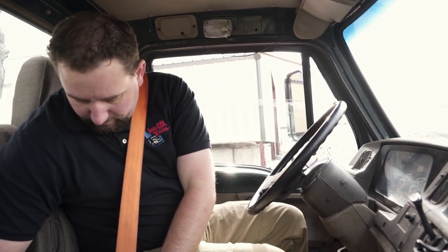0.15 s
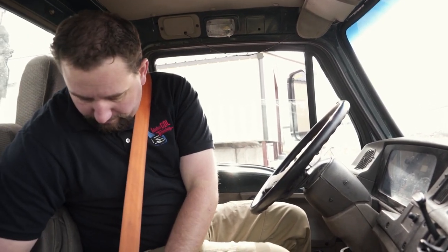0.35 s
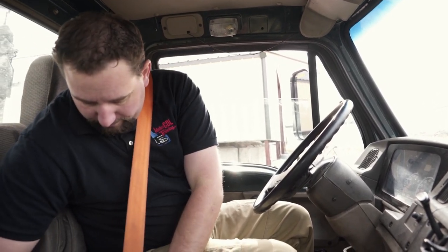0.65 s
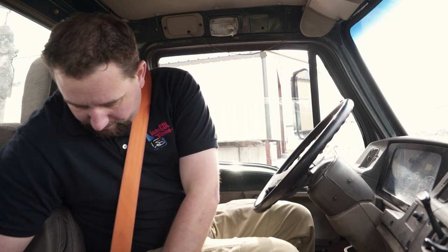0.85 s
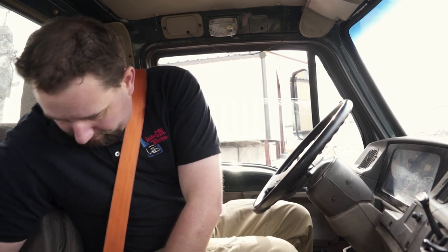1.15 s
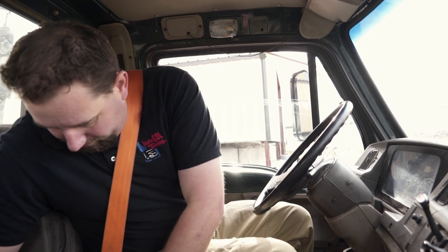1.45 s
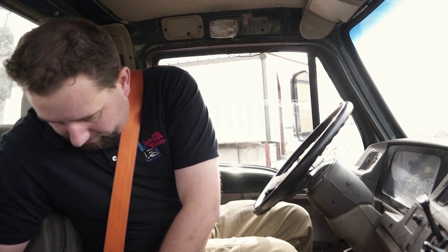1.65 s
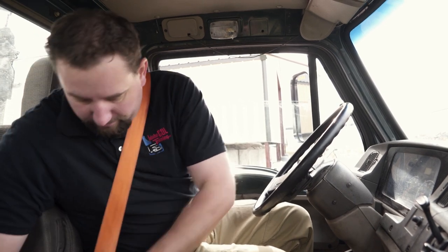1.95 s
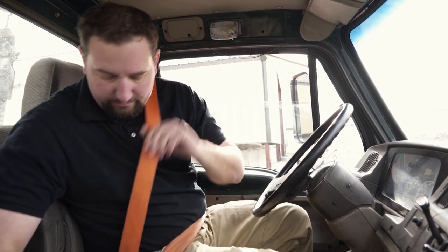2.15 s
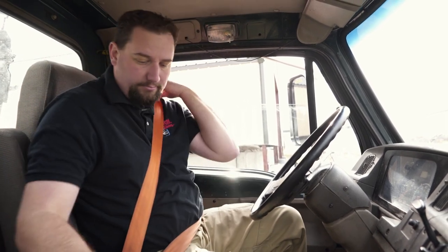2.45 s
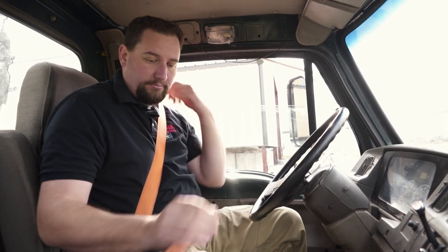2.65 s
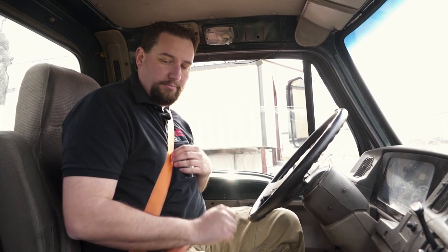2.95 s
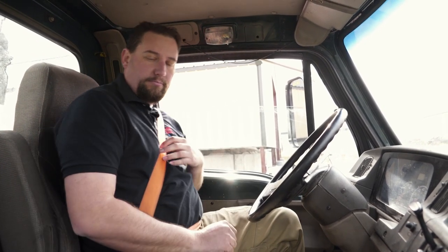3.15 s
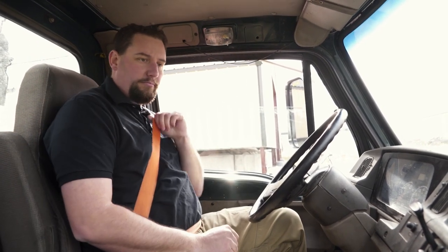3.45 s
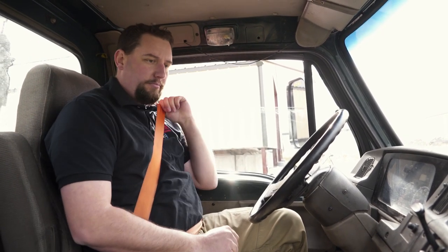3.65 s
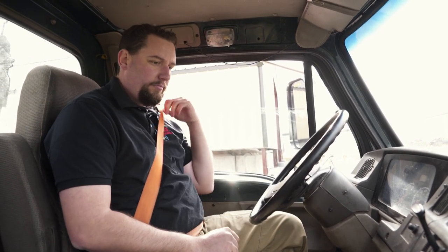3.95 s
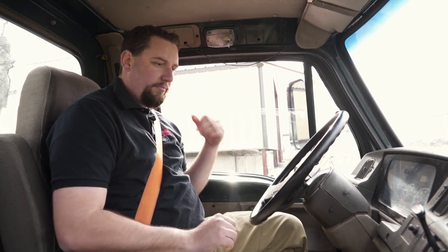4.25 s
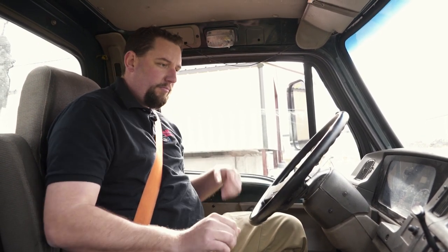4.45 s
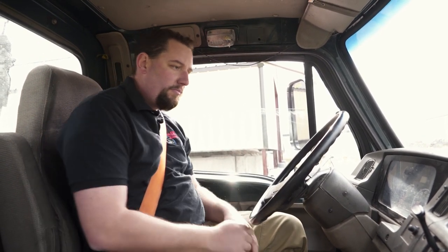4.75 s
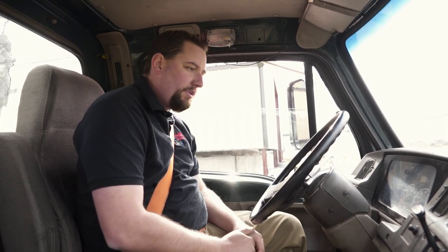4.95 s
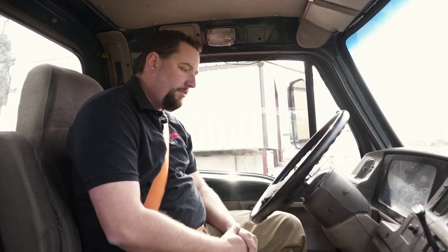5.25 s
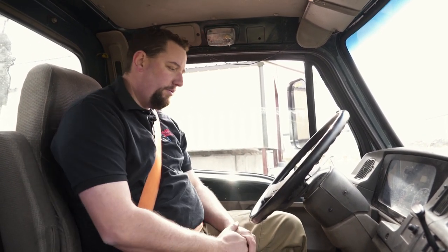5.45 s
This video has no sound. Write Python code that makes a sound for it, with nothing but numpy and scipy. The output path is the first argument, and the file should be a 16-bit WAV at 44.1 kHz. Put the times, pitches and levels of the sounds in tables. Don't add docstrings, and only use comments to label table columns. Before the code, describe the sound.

Inside a parked truck cab, cloth scuffs and a buckle knocks and rattles, then latches with a sharp metallic snap before soft webbing strokes and thuds.

```python
import sys
import numpy as np
from scipy import signal
from scipy.fft import rfft, irfft, next_fast_len
from scipy.io import wavfile
from scipy.ndimage import uniform_filter1d, map_coordinates

SR = 44100
rng = np.random.default_rng(int(sys.argv[2]) if len(sys.argv) > 2 else 0)


def volts_from_decibels(level):
    exponent = np.asarray(level, float) / 20
    return 10 ** exponent


def master(y):
    cut = np.clip(np.atleast_2d(y).T, -1, 1)
    pcm = np.round(cut * 32767)
    wavfile.write(sys.argv[1], SR, pcm.astype(np.int16))


N = 246903
LATCHED_S = 1.7


def along(points, hz):
    f, v = np.transpose(points)
    return np.interp(np.log(hz + 1), np.log(f + 1), v)


def curve(points):
    s, db = np.transpose(points)
    return np.interp(np.arange(N) / SR, s, db)


def wobble(rate_hz):
    knots = rng.standard_normal(int(N * rate_hz / SR) + 4)
    return map_coordinates(knots, [np.arange(N) * rate_hz / SR])


def coloured(x, spectrum):
    m = next_fast_len(len(x) + 8192)
    gain = volts_from_decibels(along(spectrum, np.fft.rfftfreq(m, 1 / SR)))
    return irfft(rfft(x, m) * gain, m)[:len(x)]


def noise(spectrum, size, grit_db=0):
    grains = rng.standard_normal(size) * volts_from_decibels(grit_db * rng.standard_normal(size))
    x = coloured(grains, spectrum)
    return x / np.sqrt(np.mean(x ** 2))


def add(track, s, sound):
    part = track[round(s * SR):][:len(sound)]
    part += sound[:len(part)]


def swells(rows, levels_db):
    t = np.arange(0, N / SR + .01, .001)[:, None]
    peak, rise, fall = (np.array([row[k] for row in rows]) for k in (0, 2, 3))
    away = np.where(t < peak, (peak - t) / rise, (t - peak) / fall)
    power = np.sum(volts_from_decibels(levels_db - 20 * away) ** 2, axis=1)
    return np.interp(np.arange(N) / SR, t[:, 0], np.sqrt(power))


def patchy(x, depth_db):
    z = signal.stft(x, nperseg=512)[2]
    field = uniform_filter1d(rng.standard_normal(z.shape), size=9, axis=0)
    field = uniform_filter1d(field, size=9, axis=1)
    return signal.istft(z * volts_from_decibels(depth_db * field / field.std()), nperseg=512)[1][:N]


# pitch_hz, level_db
QUIET_COLOUR = [(12, -34.5), (20, -6), (70, 3.5), (154, -2.5), (293, -19), (485, -10.5), (1120, -17),
                (1290, -20.5), (11400, -48), (12300, -70.5), (16000, -73.5)]


def quiet_cab():
    return volts_from_decibels(-65) * noise(QUIET_COLOUR, N)


# time_s, level_db
SEAT_SWAY = [(0.0, -52), (0.36, -68.5), (0.65, -67), (0.9, -52), (1.54, -54), (1.64, -53), (2.17, -61),
             (2.45, -53), (2.77, -68.5), (3.04, -55.5), (3.2, -55), (3.55, -48.5), (3.84, -60), (4.13, -70),
             (5.01, -59), (5.6, -70)]
# pitch_hz, level_db
RUMBLE_COLOUR = [(8.8, -27), (15, 0), (37, 3.5), (65, -5.5), (140, -6.5), (225, -27), (260, -12),
                 (340, -59), (570, -120)]


def seat_rumble():
    return volts_from_decibels(curve(SEAT_SWAY) + 4.3 * wobble(5.4)) * noise(RUMBLE_COLOUR, N)


# peak_s, level_db, rise_s, fall_s
SCUFF_MOVES = [(0.0, -59.5, .1, 0.12), (.425, -64.5, 0.021, 0.17), (.53, -65, 0.34, 0.024),
               (.674, -59, 0.13, 0.15), (1.0, -54, 0.27, 0.14), (1.171, -47, 0.11, 0.049),
               (1.29, -52, 0.062, 0.14), (1.349, -46, 0.24, 0.0094), (1.41, -71, 0.11, 0.05),
               (1.74, -68, 0.41, 0.37), (1.93, -53.5, 0.026, 0.12), (2.13, -53, 0.37, 0.061),
               (2.37, -54, 0.6, 0.16), (2.54, -48.5, 0.11, 0.11), (2.66, -67.5, 0.063, 0.96),
               (3.04, -57, 0.25, 0.36), (3.28, -53.5, 0.073, 0.26), (3.66, -50, 0.18, 0.15),
               (3.8, -50.5, 0.022, 0.042), (3.89, -61.5, 0.11, 0.2), (4.09, -54.5, 0.1, 0.11),
               (4.229, -68.5, 0.022, 0.69), (4.87, -66, 1.42, 0.092), (5.06, -65, 0.079, 0.3),
               (5.429, -68, 0.072, 0.24)]
# pitch_hz, level_db
SCUFF_COLOUR = [(88, -29.5), (150, -2), (194, -3), (328, -4), (463, -6.5), (637, -7.5), (715, -8.5),
                (1800, -13), (3200, -34.5), (4160, -51), (7040, -120)]
# pitch_hz, level_db
BODY_SHADE = [(800, 0.5), (1500, -4), (2500, -2)]


def scuffing(flutter):
    levels_db = np.transpose(SCUFF_MOVES)[1]
    unsteady = volts_from_decibels(0.74 * flutter + 2.6 * wobble(90))
    scuff = swells(SCUFF_MOVES, levels_db) * unsteady * noise(SCUFF_COLOUR, N, grit_db=3.0)
    bent_over = np.arange(N) < LATCHED_S * SR
    return np.where(bent_over, coloured(scuff, BODY_SHADE), scuff)


# peak_s, level_db, rise_s, fall_s, weave_over_rub_db
WEBBING_TUGS = [
    (.1, -72.5, 0.14, 0.053, -7.5),
    (.5, -79, 0.066, 0.051, -15),
    (.666, -72, 0.096, 0.14, -9.5),
    (.812, -73, 0.051, 0.15, -13),
    (.99, -71, 0.33, 0.21, -11),
    (1.0, -75, 0.011, 0.18, -9),
    (1.178, -64.5, .15, 0.037, -11.5),
    (1.28, -67.5, 0.058, 0.13, -8.5),
    (1.346, -59.5, 0.17, 0.02, -20),
    (1.74, -66.5, 0.42, 0.2, -11),
]
# peak_s, level_db, rise_s, fall_s, weave_over_rub_db
SMOOTHING_STROKES = [(1.95, -64, 0.03, .06, -16), (2.01, -63, 0.041, 1.2, -12.5),
                     (2.18, -69, 0.28, 0.24, -17), (2.299, -48.5, 0.19, 0.17, -7),
                     (2.53, -60.5, 0.41, .16, -10.5), (2.66, -76.5, 0.11, 0.89, -5.5),
                     (3.08, -62, 0.22, 0.19, -7.5), (3.265, -69, 0.054, 0.23, -2.5),
                     (3.33, -66, 0.087, 0.19, -3.5), (3.56, -76, 0.2, .5, 4),
                     (3.677, -57.5, 0.18, 0.074, -2), (3.74, -70, 0.12, 0.38, 2),
                     (3.98, -78.5, 0.14, 0.15, 3), (4.047, -52, 0.045, 0.02, 0),
                     (4.09, -62.5, 0.072, 0.041, -11), (4.15, -75, 0.043, 0.024, -10),
                     (4.27, -74.5, 0.069, 0.081, -15), (4.62, -74, 0.11, 1.25, -10.5),
                     (4.86, -70, 0.6, 0.25, -6.5), (4.95, -66.5, 0.09, 0.12, -8.5),
                     (5.05, -83, .1, 0.76, 0.5), (5.259, -80, 0.07, 0.22, -3.5),
                     (5.4, -84.5, 0.045, .2, -12.5), (5.59, -75.5, .7, .1, -9)]
# pitch_hz, level_db
RUB_COLOUR = [(1060, -21), (1800, 1), (2760, -1), (3700, -5), (4010, -4), (5360, -10.5), (7000, -14),
              (9100, -32), (15400, -120)]
# pitch_hz, level_db
WEAVE_COLOUR = [(3240, -32), (5500, -3.5), (6270, -4), (7960, -2.5), (9800, -9), (12700, -38.5),
                (21600, -120)]
# pitch_hz, level_db
FIBRE_COLOUR = [(5590, -32.5), (9500, 0.5), (13100, 0.5), (15200, -7.5), (16000, -11)]


def webbing(flutter):
    drags = WEBBING_TUGS + SMOOTHING_STROKES
    rub_db, share_db = np.transpose(drags)[[1, 4]]
    rub = swells(drags, rub_db) * volts_from_decibels(0.61 * flutter + .6 * wobble(150))
    rub *= noise(RUB_COLOUR, N, grit_db=0.5)
    weave = swells(drags, rub_db + share_db) * volts_from_decibels(0.39 * flutter + 0.65 * wobble(220))
    weave *= noise(WEAVE_COLOUR, N, grit_db=5.5)
    fibre = swells(drags, rub_db + 1.2 * share_db - 2) * volts_from_decibels(.8 * flutter)
    fibre *= noise(FIBRE_COLOUR, N, grit_db=2.0)
    return rub + weave + fibre


def fabric():
    flutter = wobble(30)
    rumble = seat_rumble()
    scuff = scuffing(flutter)
    hiss = webbing(flutter)
    return rumble + patchy(scuff, depth_db=2.5) + patchy(hiss, depth_db=1.5)


# centre_s, peak_db, pitch_hz, half_length_s
SEAT_THUDS = [(.095, -49.5, 153, 0.0062), (0.491, -56.5, 298, 0.0099), (0.687, -44, 61.4, 0.015),
              (0.673, -47, 280, 0.008), (0.78, -41.5, 35.4, 0.017), (1.173, -42.5, 148, 0.011),
              (1.558, -40, 62, 0.035), (1.615, -30.5, 116, 0.008), (1.647, -32.5, 50.07, 0.016),
              (1.674, -28.5, 249, 0.0027), (1.679, -18, 144, 0.0033), (1.704, -39, 32, 0.044),
              (1.594, -44, 300, 0.0054), (1.6254, -26.5, 180, 0.0027), (1.66, -39, 198.9, .008),
              (1.919, -35, 202, 0.002), (1.769, -48.5, 29.6, 0.035), (2.475, -46, 155, 0.0039),
              (2.563, -35.5, 83, 0.011), (3.05, -54.5, 60.8, 0.046), (3.271, -43, 69, 0.015),
              (3.6765, -29.5, 159.4, 0.0038), (3.684, -28, 124, 0.0064), (3.697, -32, 69.5, 0.017),
              (4.091, -42, 241, 0.0051), (4.097, -25, 122.7, 0.0082), (4.109, -32.5, 80.3, 0.013),
              (4.128, -38.5, 45, 0.011), (4.155, -45, 44.9, 0.022), (4.939, -48, 269.5, 0.013)]


def thuds():
    out, t = np.zeros(N), np.arange(-SR // 12, SR // 12) / SR
    for s, db, hz, half_s in SEAT_THUDS:
        shake = 0.2 * noise([(hz, -30), (1.4 * hz, 0), (4.0 * hz, -12), (9 * hz, -70)], len(t))
        swing = np.cos(2 * np.pi * hz * t) + shake
        add(out, s + t[0], volts_from_decibels(db) * np.exp(-(t / half_s) ** 2) * swing)
    return out


# peak_s, level_db, rise_s, fall_s, pitch_hz
NARROW_DRAGS = [(.5, -66, 0.11, .15, 35), (.72, -61.5, 0.14, 0.06, 430), (1.01, -61, 0.011, 0.053, 2900),
                (1.99, -56, .08, 0.071, 53), (2.27, -53, 0.045, .08, 2800), (2.29, -56, 0.15, 0.13, 7400),
                (2.85, -72, 0.32, 0.16, 1660), (3.36, -65, 0.058, 0.079, 8000), (3.56, -68, .1, .1, 13000),
                (3.9896, -62.5, 0.056, .15, 744), (4.95, -60.5, .08, 0.081, 134),
                (5.41, -58, 0.014, 0.064, 420), (5.405, -60, .015, 0.05, 2020),
                (3.65, -42, 0.15, 0.044, 85), (3.63, -49.5, .06, .06, 266), (2.325, -58, .06, .06, 2170),
                (1.3, -50.5, .1, .06, 70), (1.6, -60.5, 0.066, .06, 1200)]


def zips():
    out = np.zeros(N)
    for row in NARROW_DRAGS:
        level_db, hz = row[1], row[4]
        band = [(.5 * hz, -50), (.82 * hz, -4), (1.2 * hz, -4), (2 * hz, -50)]
        out += swells([row], np.array([level_db])) * noise(band, N, grit_db=5)
    return out


# start_s, peak_db, pitch_hz, t60_s
HOLLOW_RINGS = [(.416, -53, 790, .03), (.526, -51, 900, .02), (.994, -34.5, 453, 0.035),
                (1.002, -36.5, 550, 0.078), (1.092, -55, 790, .04), (1.153, -40.5, 902, 0.052),
                (1.297, -45, 872, .04), (1.328, -47.5, 2340, 0.066), (1.337, -32, 705, 0.062),
                (1.340, -53, 4160, .08), (1.398, -47, 594, 0.036), (1.488, -44, 795, 0.29),
                (1.505, -44, 607, .1), (1.522, -24.5, 560, 0.031), (1.529, -29, 758, 0.075),
                (1.563, -30, 327, .02), (1.589, -43.5, 446, .04), (1.612, -42, 500, 0.046),
                (1.623, -41.5, 604.3, .03), (1.636, -32, 696.6, 0.036), (1.645, -33, 416.3, 0.045),
                (1.654, -34, 451, .06), (1.742, -65, 3880, .2), (1.748, -73, 5320, 0.3),
                (1.935, -58, 665, .15), (1.971, -48, 644, 0.17), (2.010, -52, 563, 0.042),
                (2.095, -45.5, 395, 0.07), (2.123, -52.5, 650, 0.18), (2.372, -43, 940, 0.087),
                (2.393, -40.5, 655, 0.093), (2.525, -46, 615, 0.11), (3.271, -40.5, 694, 0.024),
                (3.272, -52, 1520, 0.042), (3.279, -43, 487, 0.034), (3.425, -46, 894, 0.033),
                (3.628, -33.5, 345, 0.038), (3.663, -34, 90, 0.073), (3.799, -43.5, 850, 0.04),
                (3.909, -46, 420, 0.049), (4.038, -43, 2150, 0.013), (4.045, -45.5, 1200, 0.02),
                (4.051, -41, 2086, 0.022), (4.089, -36, 987, 0.027), (4.090, -42.5, 2000, 0.034),
                (4.863, -53, 2263, .015), (4.912, -52.5, 767, 0.088), (4.923, -39.5, 1016, 0.048),
                (5.4, -46.5, 908, 0.033)]


def rings():
    out, t = np.zeros(N), np.arange(SR // 5) / SR
    for s, db, hz, t60 in HOLLOW_RINGS:
        rise = 1 - np.exp(-t * hz)
        add(out, s, volts_from_decibels(db - 1.5 - 60 * t / t60) * rise * np.sin(2 * np.pi * hz * t))
    return out


# start_s, peak_db, pitch_hz,
# bright_edge_db
SOFT_RATTLES = [(0.417, -57, 304, -27), (0.478, -62, 382, 1), (0.66, -45, 308, -6.5),
                (0.719, -58, 660, -15), (0.971, -53, 460, -2), (1.151, -45, 880, -11),
                (1.259, -50, 420, -16), (1.328, -43, 694, -20), (1.4, -47.5, 416, -29),
                (1.521, -26.5, 590, -29), (1.532, -35, 517, -7), (1.636, -29, 428, -18),
                (1.64, -34, 801, -2.5), (1.968, -53, 680, -25.5), (2.368, -30, 620, -46),
                (2.52, -39, 640, -22), (2.545, -38.5, 1010, -8.5), (3.266, -38, 637, -16),
                (3.409, -46.5, 580, -28), (3.615, -41, 337, -4), (3.677, -36.5, 303, -8),
                (3.798, -38, 796, -33), (3.912, -60, 410, -22.5), (4.035, -50, 780, -13),
                (4.084, -32, 577, -23), (4.144, -54, 668, -15), (4.911, -33.5, 765, -34),
                (5.053, -53, 754, -26), (5.392, -36, 825, -29.5)]
# pitch_hz, level_db
BUCKLE_COLOUR = [(120, -28.5), (300, -2), (750, -1.5), (1150, -5.5), (2300, -16.5), (4500, -29.5),
                 (9000, -56.5)]
# pitch_hz, level_db
TRIM_COLOUR = [(120, -40), (250, -10), (600, -2), (800, 0), (1030, -1), (1300, -8), (1800, -7), (2200, -7),
               (2450, -24), (3200, -36), (5000, -70)]
# pitch_hz, level_db
EDGE_COLOUR = [(1500, -38), (2500, 7.5), (4500, 0), (7000, -14.5), (10000, -24.5), (15000, -47.5)]


def rattles():
    out, t = np.zeros(N), np.arange(SR // 5) / SR
    clumps = volts_from_decibels(3.6 * wobble(180))
    rise_s, t60_s = 0.0058, 0.11
    fade = volts_from_decibels(-60 * t / t60_s) * (1 - np.exp(-(t / rise_s) ** 2))
    for s, db, hz, edge_db in SOFT_RATTLES:
        band = [(0.5 * hz, -90), (0.64 * hz, -24), (hz, 0), (1.1 * hz, -24), (2.8 * hz, -90)]
        touched = BUCKLE_COLOUR if s < LATCHED_S else TRIM_COLOUR
        body = .5 * noise(band, len(t)) + noise(touched, len(t), grit_db=5.0)
        edge = volts_from_decibels(edge_db) * noise(EDGE_COLOUR, len(t), grit_db=5.5)
        sound = fade * clumps[round(s * SR):][:len(t)] * (body + edge)
        even = np.linalg.norm(fade) / np.linalg.norm(sound)
        add(out, s, volts_from_decibels(db - 5.5) * sound * even)
    return out


# start_s, peak_db, pitch_hz, t60_s
SMALL_TICKS = [(0.528, -54, 4830, 0.0069), (1.341, -56, 3500, 0.062), (1.483, -58, 6260, 0.039),
               (1.531, -58, 6300, 0.066), (1.544, -63.5, 6500, 0.24), (1.648, -53.5, 6500, 0.11),
               (1.918, -57.5, 8300, 0.059), (2.586, -56, 3500, 0.034), (2.938, -64, 4950, 0.011),
               (3.81, -63, 10050, 0.011), (4.863, -50, 2280, 0.011), (4.951, -58, 8420, 0.011),
               (5.010, -56, 7480, 0.012), (5.259, -57, 1960, 0.017)]


def ticks():
    out, t = np.zeros(N), np.arange(SR // 10) / SR
    rise = 1 - np.exp(-t / 0.00059)
    for s, db, hz, t60 in SMALL_TICKS:
        grain = noise([(.3 * hz, -60), (0.6 * hz, -3), (1.06 * hz, -3), (4.8 * hz, -50)], len(t))
        add(out, s, volts_from_decibels(db - 60 * t / t60) * rise * grain)
    return out


# start_s, peak_db, pitch_hz, bright_edge_db, t60_s
BUCKLE_KNOCKS = [
    (0.997, -21.5, 544, -43, 0.12),
    (1.341, -31, 700, -19.5, 0.075),
    (1.481, -25.5, 480, -29.5, 0.11),
    (1.548, -25, 320, -33, 0.092),
    (1.6094, -29.5, 253, -32, 0.11),
    (1.6247, -25.5, 250, -29, 0.12),
    (1.9155, -31, 626, -22, 0.094),
    (3.881, -44, 463, -34, 0.047),
]
PUSH_WAY = [-1, 1, 1, 1, 1, 1, -1, 1]


def knocks():
    out, t = np.zeros(N), np.arange(SR // 5) / SR
    for (s, db, hz, edge_db, t60), way in zip(BUCKLE_KNOCKS, PUSH_WAY):
        cycle = (t - .0015) * hz - .6
        push = np.sin(2 * np.pi * cycle + 0.081) * np.exp(-(cycle / 0.36) ** 2)
        fade = volts_from_decibels(-60 * t / t60) * (1 - np.exp(-(t / 0.0026) ** 4))
        rattle = volts_from_decibels(-14) * noise(BUCKLE_COLOUR, len(t), grit_db=3.5)
        rattle += volts_from_decibels(edge_db) * noise(EDGE_COLOUR, len(t), grit_db=5.0)
        add(out, s, volts_from_decibels(db) * (1.35 * way * push + fade * rattle))
    return out


# pitch_hz, level_db, t60_s
STEEL_MODES = [(812, 0, .05), (924, 2, 0.04), (1040, 3.5, 0.019), (1860, -17, 0.045), (2030, -21, 0.04),
               (2194, -16.5, .06), (2740, -8.5, .06), (2858, -4.5, 0.055), (3388, -20, 0.087),
               (3740, -21.5, .085), (4452, -19.5, .08), (4720, -25.5, 0.065), (5030, -29, 0.026),
               (6160, -14.5, 0.052)]


def steel(t, scatter_db, dull_hz):
    out = np.zeros(len(t))
    for hz, db, t60 in STEEL_MODES:
        level_db = db + scatter_db * rng.standard_normal()
        held = 1 + (dull_hz / hz) ** 4
        out += volts_from_decibels(level_db - 60 * t / min(t60, .085)) * np.sin(2 * np.pi * hz * t) / held
    return out


# start_s, level_db
TONGUE_TOUCHES = [
    (1.338, -71),
    (1.346, -75),
    (1.531, -50),
    (1.647, -53),
    (1.752, -77),
]


def touches():
    out, t = np.zeros(N), np.arange(SR // 4) / SR
    rise = 1 - np.exp(-t / 0.00072)
    for s, db in TONGUE_TOUCHES:
        add(out, s, volts_from_decibels(db + 9) * rise * steel(t, scatter_db=5.5, dull_hz=3500))
    return out


# start_s, level_db, held_still_under_hz
PAWL_STRIKES = [
    (1.6732, -38, 300),
    (1.6767, -13, 300),
    (1.6782, -16, 1500),
    (1.6812, -19, 1309),
    (1.684, -20, 800),
    (1.698, -36.5, 1001),
    (1.712, -46.5, 1001),
]
# pitch_hz, level_db
SNAP_COLOUR = [(180, -43.5), (300, -13.5), (740, -15), (940, 1.5), (1610, -20), (1870, -10.5), (2570, -8),
               (2840, -7.5), (3700, -12.5), (5080, -17.5), (6300, -20), (9390, -28.5), (16000, -34)]


def latch():
    out, t = np.zeros(N), np.arange(SR // 4) / SR
    rise = 1 - np.exp(-t / 0.0012)
    for s, db, still_hz in PAWL_STRIKES:
        clatter = volts_from_decibels(-3.5 - 60 * t / 0.065) * noise(SNAP_COLOUR, len(t), grit_db=1.0)
        add(out, s, volts_from_decibels(db) * rise * (steel(t, scatter_db=3.0, dull_hz=still_hz) + clatter))
    return out


# time_s, level_db
STRAP_HUM = [
    (2.35, -93),
    (2.48, -60.5),
    (2.62, -70),
    (2.74, -66.5),
    (2.92, -74),
    (3.1, -92),
]


def strap():
    hz = 528 + 3 * wobble(15)
    return volts_from_decibels(curve(STRAP_HUM) + 1.5 * wobble(25.17)) * np.sin(2 * np.pi * np.cumsum(hz) / SR)


# pitch_hz, left_minus_right_db
MIC_LEAN = [(60, -.7), (1500, -.65), (3000, -.55), (3800, 0)]


def scene():
    mono = fabric() + knocks() + rattles() + ticks() + thuds()
    mono += latch() + touches() + strap()
    mono += quiet_cab() + rings() + zips()
    return np.array([coloured(mono, [(hz, side * db / 2) for hz, db in MIC_LEAN]) for side in (1, -1)])


def band_rms(z, size):
    blocks = z[:1024].reshape(-1, size, z.shape[1])
    return np.sqrt(np.mean(abs(blocks) ** 2, 1)).repeat(size, 0)


def above_gate(z, size, gate, hz):
    width_hz = size * hz[1]
    floor = volts_from_decibels(along(gate, hz[:1024] // width_hz * size * hz[1]))
    return band_rms(z, size) > floor[:, None]


# pitch_hz, level_db
TREBLE_FLOOR = [(11900, -200), (12000, -113), (13800, -113.5), (15700, -116.5)]
# pitch_hz, level_db
WIDTH_FLOOR = [(60, -95.5), (300, -102), (900, -105), (3000, -109)]


def drop_faint(pair):
    middle, difference = pair.mean(0), (pair[0] - pair[1]) / 2
    hz, _, (mid, side) = signal.stft([middle, difference], SR, nperseg=2048)
    hiss = band_rms(mid, 32)[530]
    bass_width = band_rms(side, 16)[:64].max(0)
    calm = hiss < volts_from_decibels(3) * bass_width
    side[:1024] *= above_gate(side, 4, WIDTH_FLOOR, hz) * calm
    mid[:1024] *= above_gate(mid, 16, TREBLE_FLOOR, hz)
    mid, side = signal.istft(np.array([mid, side]), SR, nperseg=2048)[1][:, :N]
    return np.array([mid + side, mid - side])


def roll_off(x):
    return signal.sosfilt(signal.butter(12, 16400, fs=SR, output="sos"), x)


def record(dry):
    limited = np.array([coloured(x, [(15750, 0), (15900, -45)]) for x in dry])
    mix = drop_faint(limited)
    return roll_off(mix)


dry = scene()
out = record(dry)
master(out)
```